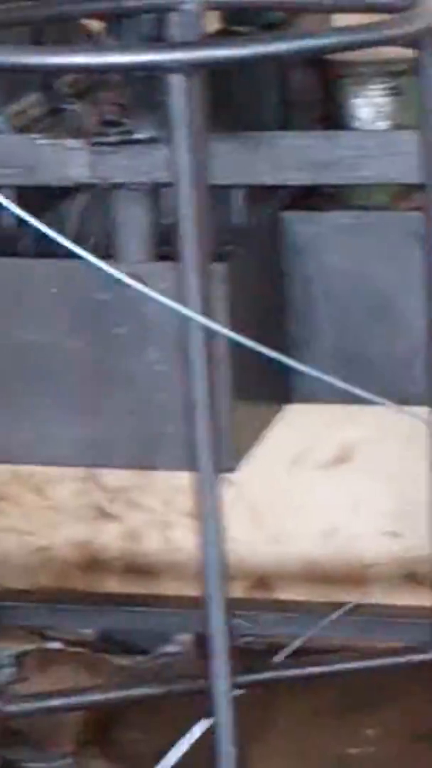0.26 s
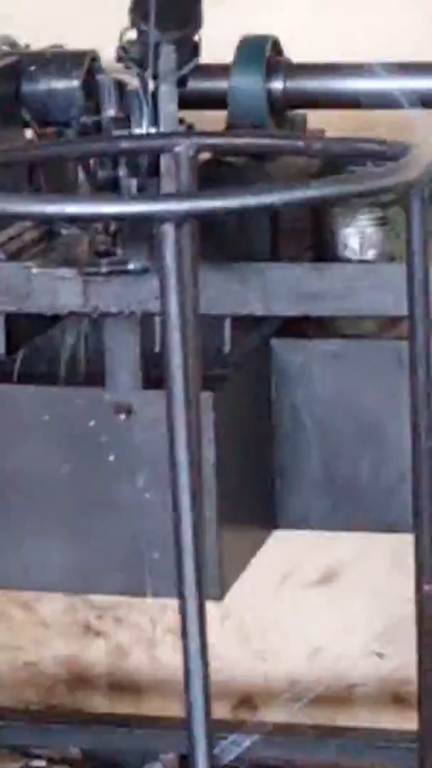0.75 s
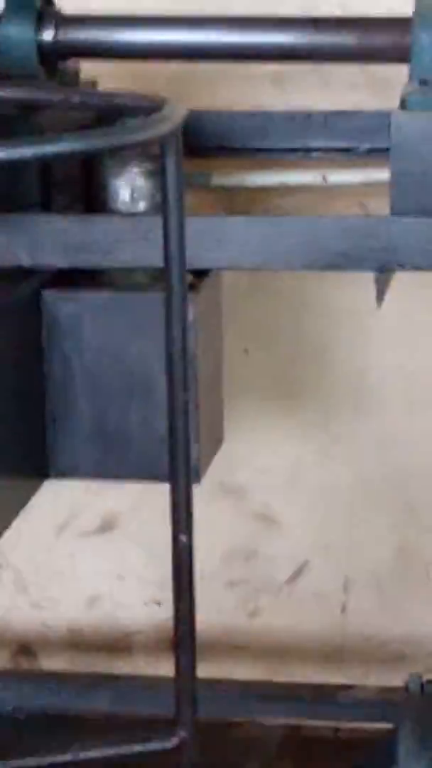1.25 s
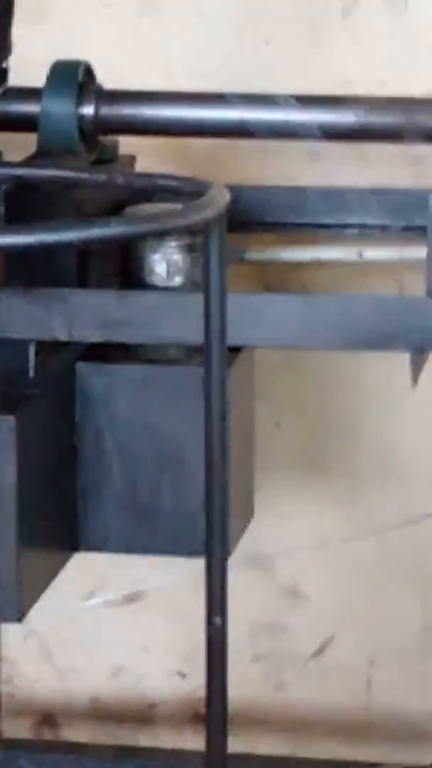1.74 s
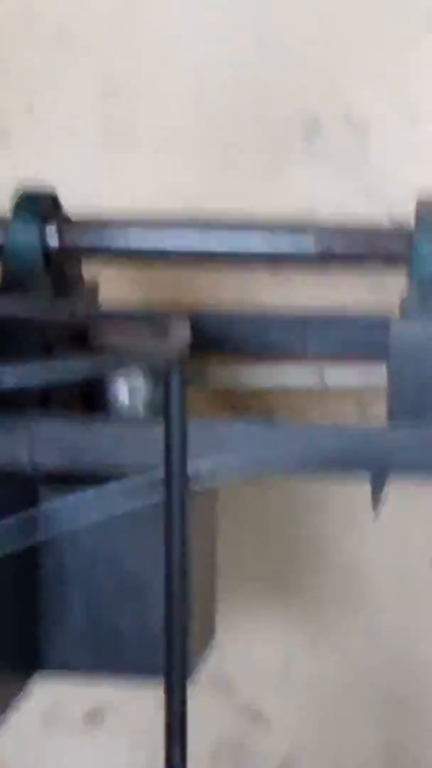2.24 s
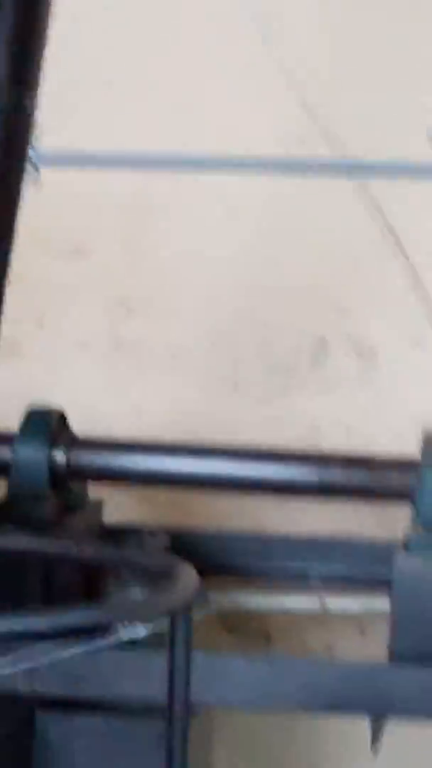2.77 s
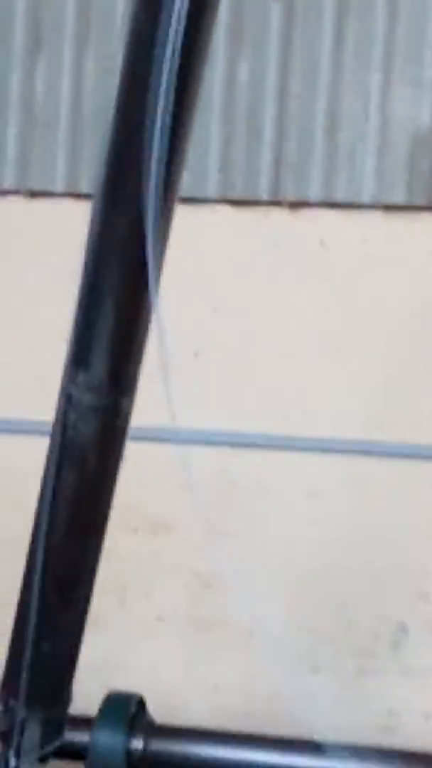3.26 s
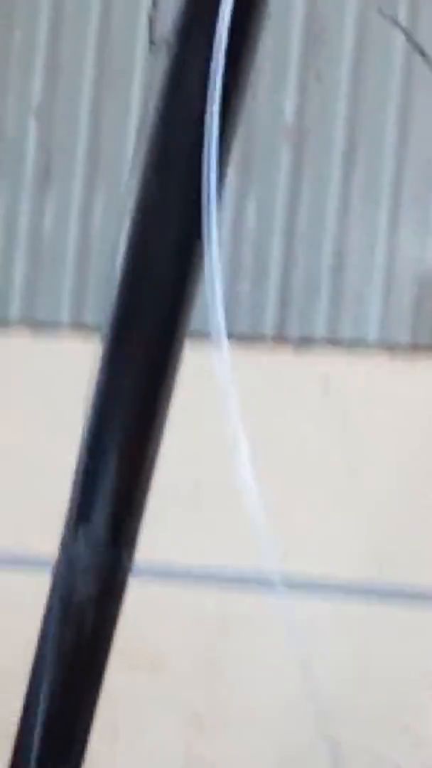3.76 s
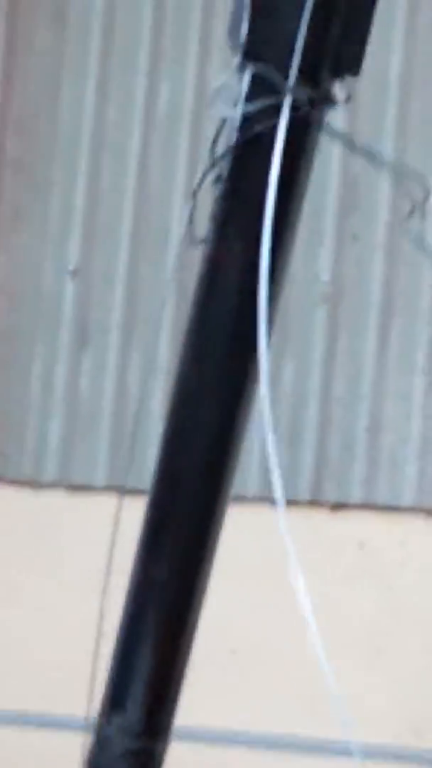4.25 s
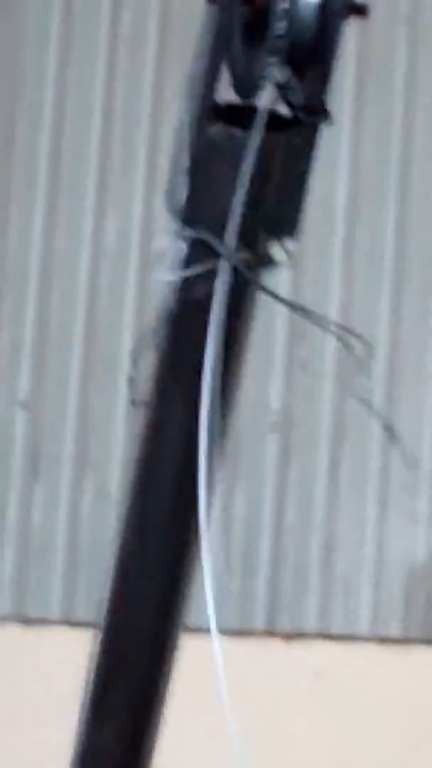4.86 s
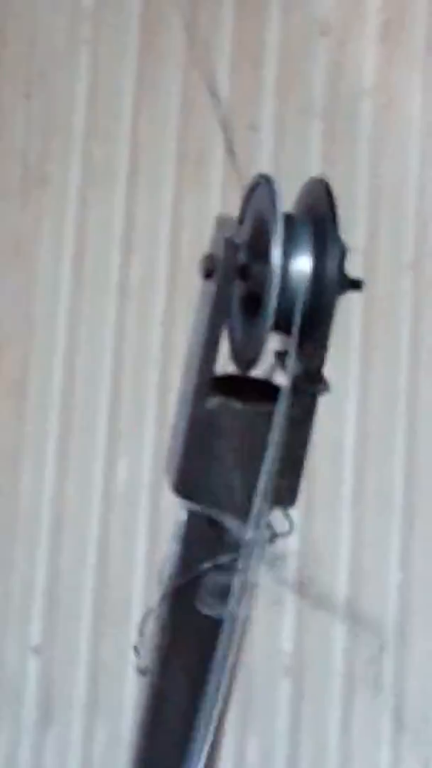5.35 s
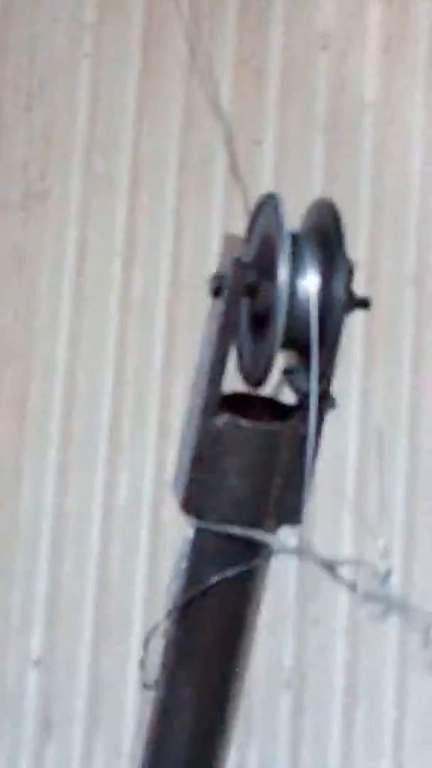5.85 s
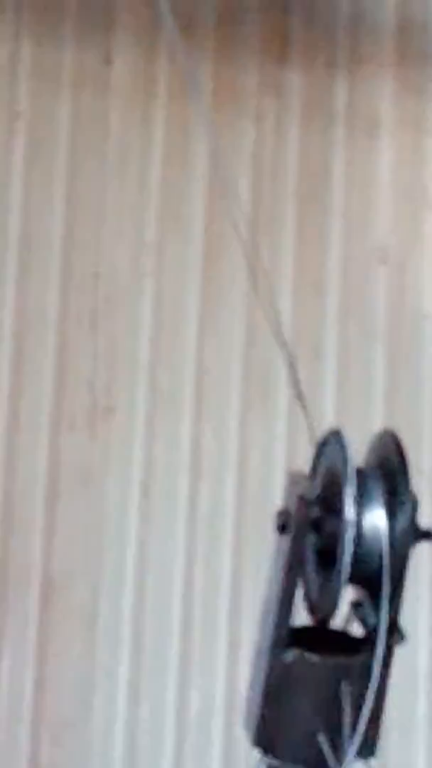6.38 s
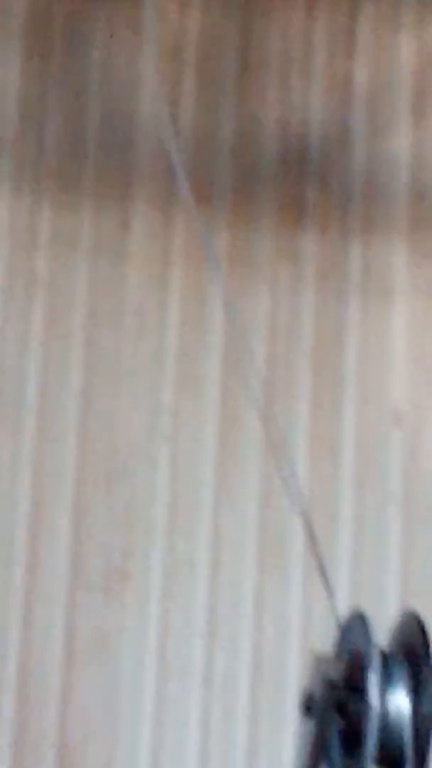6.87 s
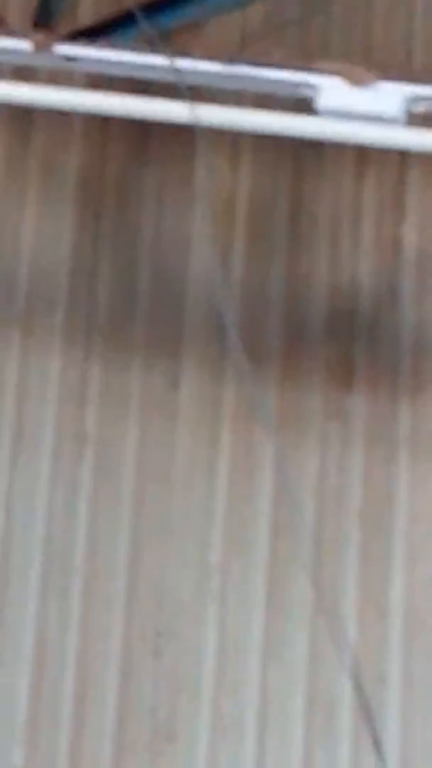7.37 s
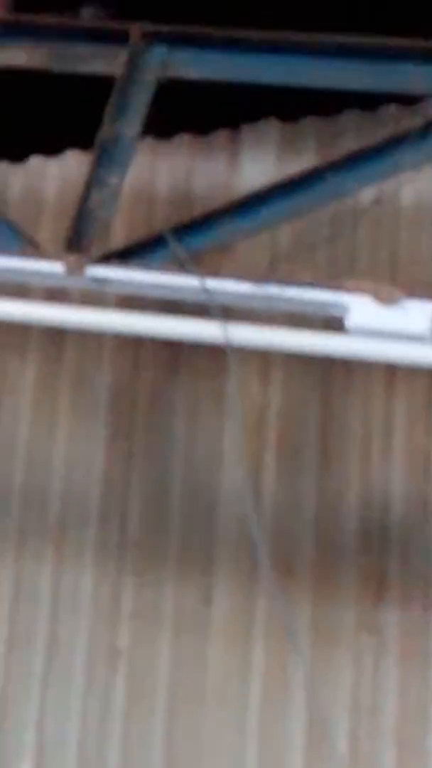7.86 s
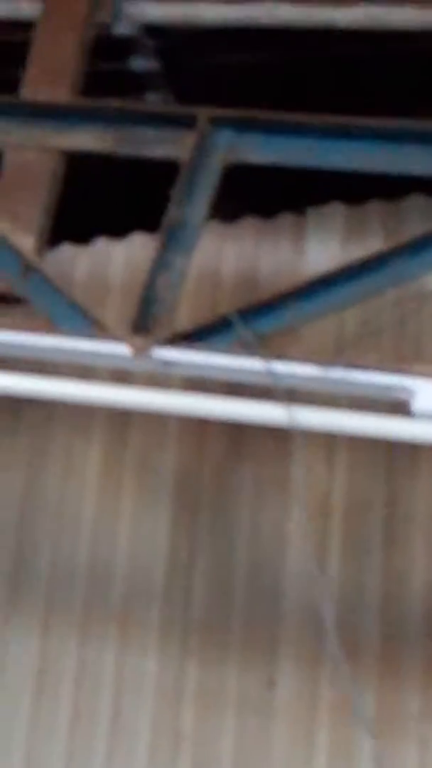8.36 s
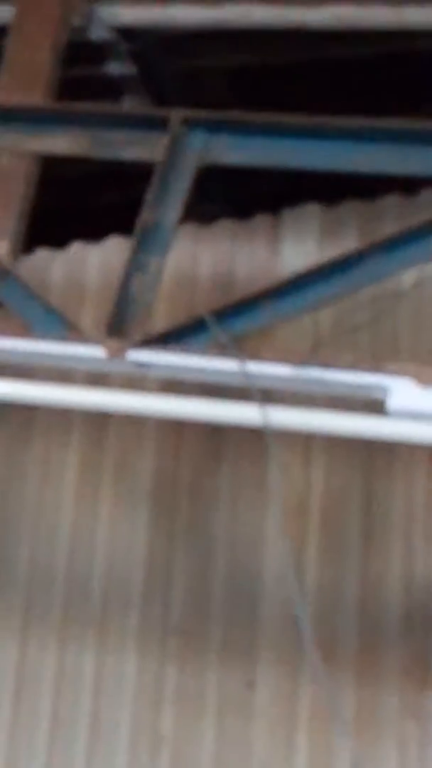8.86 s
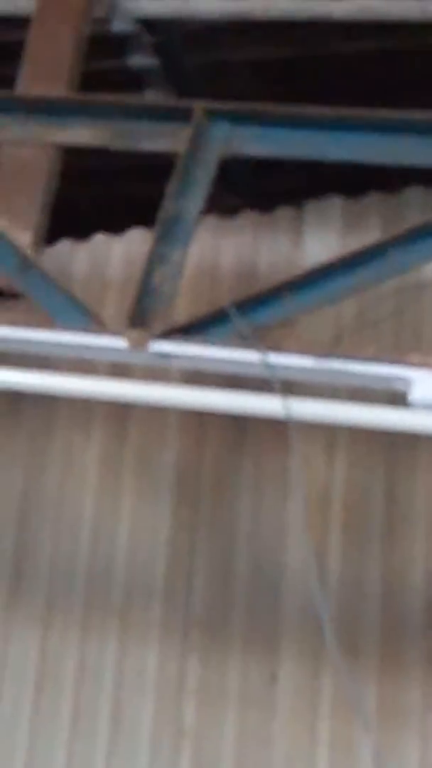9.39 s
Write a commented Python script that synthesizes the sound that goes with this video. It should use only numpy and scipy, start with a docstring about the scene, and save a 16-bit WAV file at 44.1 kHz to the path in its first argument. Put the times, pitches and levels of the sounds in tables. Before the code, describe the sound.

Latch click, hard clank, then a harsh rattle of rollers and wire coasting to rest, repeated four times over faint workshop hiss and hum.

```python
"""Workshop hiss and motor hum come first, then slack wire ticking on its guides in a metal-roofed shed.
A wire weaving machine works in strokes before two small microphones: a latch clicks, the drive clanks in,
feed rollers and wire rattle through the steel frame for a second and coast to rest.
Filtered noise makes the hiss, sines the hum, noise bursts into ringing modes the struck metal,
random contacts through frame resonances the rattle, and feedback delays the shed."""
import sys
import numpy as np
from scipy import signal
from scipy.fft import rfft, irfft, next_fast_len
from scipy.io import wavfile
from scipy.ndimage import map_coordinates

SR = 44100
rng = np.random.default_rng(int(sys.argv[2]) if len(sys.argv) > 2 else 0)


def generate_wav(sig):
    """Save sig (samples, or channels by samples) to the path in sys.argv[1] as 16-bit PCM at SR."""
    pcm = np.round(np.clip(np.atleast_2d(sig).T, -1, 1) * 32767).astype(np.int16)
    wavfile.write(sys.argv[1], SR, pcm)


N = 424241
SLOW = np.arange(0, N + 40, 40) / SR   # time steps of all slow controls, in seconds


def from_db(db):
    """dB to gain."""
    return 10 ** (np.asarray(db) / 20)


def rms_one(x):
    """Scaled to rms 1."""
    return x / np.sqrt(np.mean(x ** 2) + 1e-20)


def in_time(rows):
    """Columns of a curve, read at the slow steps."""
    s, *columns = np.transpose(rows)
    return np.array([np.interp(SLOW, s, column) for column in columns])


def per_sample(slow):
    """A slow control filled in to one value a sample."""
    return np.interp(np.arange(N) / SR, SLOW, slow)


def at_hz(points, hz):
    """A spectrum read on a log-frequency axis."""
    points_hz, values = np.transpose(points)
    return np.interp(np.log(hz), np.log(points_hz), values)


def drift(rate_hz):
    """Slow random wander of rms 1: noise through two equal low-pass poles."""
    r = np.exp(-2 * np.pi * rate_hz * SLOW[1])
    settle = 2000   # steps dropped while the filter settles
    noise = rng.standard_normal(len(SLOW) + settle)
    return rms_one(signal.lfilter([1], [1, -2 * r, r * r], noise)[settle:])


def left_right(tilt_db):
    """Gains of left and right whose levels differ by the tilt."""
    return from_db([[tilt_db / 2], [-tilt_db / 2]])


def ring(x, hz, t60_s):
    """A decaying mode: a unit click sets a sine of height 1 ringing."""
    r = from_db(-60 / (t60_s * SR))
    w = 2 * np.pi * hz / SR
    return signal.lfilter([0, np.sin(w)], [1, -2 * r * np.cos(w), r * r], x + 1e-18)


def resonate(x, hz, width_hz):
    """A resonance of gain 1 at its peak."""
    r = np.exp(-np.pi * width_hz / SR)
    poles = [1, -2 * r * np.cos(2 * np.pi * hz / SR), r * r]
    return signal.lfilter(np.array([1, 0, -1]) * (1 - r * r) / 2, poles, x)


def wandering(x, hz, width_hz):
    """A resonance whose centre wanders: shifted down to 0 Hz, smoothed, shifted back up."""
    r = np.exp(-np.pi * width_hz / SR)
    path_hz = hz * per_sample(1 + .0035 * drift(3.0))
    turn = np.exp(2j * np.pi * np.cumsum(path_hz) / SR)
    return 2 * np.real(turn * signal.lfilter([1 - r], [1, -r], x * turn.conj()))


# How alike the two microphones hear each pitch. Each row: frequency in Hz, left-right likeness from 0 to 1.
LIKENESS = [(60, 1), (290, 0.84), (640, 0.46), (1400, 0.031), (3100, 0.16), (15000, 0.068)]
# How each pitch leans between the microphones. Each row: frequency in Hz, left minus right in dB.
SIDES = [(60, -3), (150, -1), (380, -1.5), (950, 1.5), (2380, -2.5), (5980, -9), (15000, 9)]


def spread(pair, hz):
    """Two unrelated signals mixed into left and right, as alike and as balanced as this pitch is heard."""
    alike = np.clip(at_hz(LIKENESS, hz), 0, 1)
    mid, side = np.sqrt(1 + alike), np.sqrt(1 - alike)
    return (left_right(at_hz(SIDES, hz)) * [[mid, side], [mid, -side]]) @ pair


def bands(source, spectrum, db_at, patchy_db):
    """Half-octave bands, each with its own level and flicker; neighbours get unrelated sources."""
    out = 0
    edges_hz = 22 * 2 ** np.arange(0, 9.6, .5)
    for k, (low_hz, high_hz) in enumerate(zip(edges_hz, edges_hz[1:])):
        hz = np.sqrt(low_hz * high_hz)
        band = signal.butter(2, [low_hz, high_hz], "band", fs=SR, output="sos")
        pair = signal.sosfilt(band, source[k % 2])
        level_db = db_at(hz) + at_hz(spectrum, hz) + patchy_db * drift(20.3)
        out = out + per_sample(from_db(level_db)) * spread(pair, hz)
    return out


def scattered(per_s, modes, db_at):
    """Uneven clicks at random moments, each ringing one mode, leaning at random left or right."""
    out = np.zeros((2, N))
    size_db = 3 * np.minimum(rng.exponential(1, N), 4)
    lean_db = np.outer([1, -1], rng.normal(0, 3, N))
    sizes = rng.choice([-1, 1], N) * from_db(size_db + lean_db)
    clicks = rng.random(N) < per_s * per_sample(from_db(4 * drift(8))) / SR
    dealt = np.where(clicks, rng.integers(0, len(modes), N), -1)
    for k, (hz, t60_s) in enumerate(modes):
        strikes = sizes * (dealt == k) * per_sample(from_db(db_at(hz)))
        out += left_right(at_hz(SIDES, hz)) * ring(strikes, hz, t60_s)
    return out


def blows(events, modes, ring_db, crack_hz, crack_db, rise_s, focus_db, rough):
    """Each blow is a strike and a brief chatter: a crack of noise, and the modes near its two pitches.

    Each event: start in seconds, level in dB, low and high pitch in Hz, chatter in seconds,
    low and high ring in dB, left minus right in dB. The focus is dB lost per octave away from a pitch.
    """
    detune, twin_split, flutter_spread_db = .005, .012, 2.5   # the first two are shares of the pitch
    out, t = np.zeros((2, N + SR)), np.arange(SR // 4) / SR
    wide = signal.butter(2, crack_hz, "band", fs=SR, output="sos")
    push = rms_one(t * np.exp(-t / rise_s)) ** 2 / len(t)   # swells and dies away; peaks at the rise time
    for s, level_db, low_hz, high_hz, chatter_s, low_db, high_db, pan_db in events:
        chatter_s = max(chatter_s, .001)
        # the modes nearest to the two pitches lead
        low_hz, high_hz = (min(modes, key=lambda mode: abs(mode[0] - hz))[0] for hz in (low_hz, high_hz))
        chatter = rng.standard_normal(len(t)) * np.exp(-t / chatter_s) * (1 - np.exp(-t / rise_s))
        tint = resonate(chatter, low_hz, 0.041 * low_hz) + resonate(chatter, high_hz, 0.64 * high_hz)
        blow = from_db(crack_db) * signal.sosfilt(wide, chatter + 0.55 * tint)
        for (hz, t60_s), (turn, off, split) in zip(modes, rng.random((len(modes), 3))):
            from_low_db = low_db - focus_db * abs(np.log2(low_hz / hz))
            from_high_db = high_db - focus_db * abs(np.log2(high_hz / hz))
            db = max(from_low_db, from_high_db)
            if db <= -30:   # far modes stay silent
                continue
            hz = hz * (1 + detune * (2 * off - 1))
            twin_hz = hz * (1 + twin_split * (2 * split - 1))
            strike = push * np.sin(2 * np.pi * (hz * t + turn)) * 2
            strike = strike + rough * chatter / np.sqrt(chatter_s * SR)
            knots = t[::300]
            flutter_db = flutter_spread_db * np.interp(t, knots, rng.standard_normal(len(knots)))
            twins = ring(strike, hz, t60_s) + .5 * ring(strike, twin_hz, t60_s)
            blow += from_db(db + ring_db - 3.5 + flutter_db) * twins
        out[:, round(s * SR):][:, :len(t)] += from_db(level_db) * left_right(pan_db) * blow
    return out[:, :N]


# Air of the workshop above 1500 Hz. Each row: time in seconds, relative level in dB.
HISS = [(0, -32), (.38, -32), (1.9, -33.5), (2.5, -35.5), (4.0, -32.5), (4.7, -36.5), (6.2, -35),
        (6.8, -36), (7.2, -33.5), (8.8, -35), (9.62, -34.5)]
# Colour of the workshop from rumble to hiss. Each row: frequency in Hz, relative level in dB per Hz.
SHOP_COLOUR = [(15, -63), (25, -19), (96, -20), (130, -3), (189, -30), (284, -18), (324, -6.5), (382, -27),
               (473, -19.5), (729, -14.5), (2150, -27), (2460, -25), (2890, -20.5), (4450, -24),
               (15800, -21)]
# Motor hum across the shop. Each row: frequency in Hz, relative level in dB.
HUM = [(100, -74.5), (195, -63), (388, -68.5)]


def workshop():
    """Banded noise for the hiss and rumble of the shed, sines wavering in level and phase for the hum."""
    hiss_db = in_time(HISS)[0]
    db_at = lambda hz: hiss_db if hz > 1500 else -43.0   # the rumble below has no level curve
    out = from_db(8.0) * bands(rng.standard_normal((2, 2, N)), SHOP_COLOUR, db_at, patchy_db=1.8)
    t = np.arange(N) / SR
    for hz, db in HUM:
        level = per_sample(from_db(db - 1.0 + 2.0 * drift(2.7)))
        phase = per_sample(1.83 * drift(4.8))   # radians
        out = out + level * np.sin(2 * np.pi * hz * t + phase)
    return out


def shed(x):
    """Walls and roof answer: six feedback delays a side, duller on every round."""
    t60_s, wall_cut_hz = 0.47, 7400   # decay before the dulling is counted
    size = next_fast_len(N + SR)
    w = 2 * np.pi * np.arange(size // 2 + 1) / size
    dull = np.exp(-2 * np.pi * wall_cut_hz / SR)
    wall = (1 - dull) / (1 - dull * np.exp(-1j * w))
    out = np.zeros((2, len(w)), complex)
    for k, lag in enumerate(rng.integers(300, 1500, 12)):   # lags in samples
        loop = from_db(-60 * lag / SR / t60_s) * wall * np.exp(-1j * w * lag)
        out[k % 2] += loop / (1 - loop) * (-1) ** (k // 2)
    return irfft(out * rfft(x, size), size)[:, :N]


# Rings of the wire and its guides. Each row: nominal frequency in Hz, decay by 60 dB in seconds.
WIRE_MODES = [(2120, .05), (2300, .06), (2700, .1), (3020, .07), (3600, .09), (3970, .08), (4250, .08),
              (4550, .14), (4900, .055), (5700, .08), (5930, .13), (6250, .09), (7090, .025), (11885, .045)]


def stray_ticks():
    """Faint ticks of the wire at any time: random clicks ringing its modes, but for the two highest."""
    return scattered(30, WIRE_MODES[:-2], lambda hz: np.full(len(SLOW), -63.0))


# Slack wire on its guides. Each row: start in seconds, level in dB, pitch in Hz (the nearest mode leads),
# chatter in seconds, ring in dB.
TICKS = [(0.086, -38, 3950, 0.041, -14), (.128, -30, 3950, 0.034, -3), (.15, -39, 2300, .03, 1),
         (2.338, -20, 7340, .005, -23), (2.347, -31.5, 4550, 0.041, -22), (2.427, -28, 2980, 0.012, -17),
         (3.898, -17.5, 2930, 0.011, -19), (4.209, -35, 3950, .012, -9), (4.481, -34, 5700, 0.012, 0),
         (4.485, -25, 2980, 0.02, -10), (4.506, -40, 4900, 0.015, 2), (4.521, -45, 5700, .015, -2),
         (4.538, -46, 4900, .012, 1), (6.39, -48, 7090, .015, 11), (6.642, -18.5, 7090, 0.0062, -6),
         (6.653, -29, 7090, 0.022, 4.5), (6.66, -42, 2980, .012, 1), (6.68, -35.5, 6250, 0.03, 1),
         (6.849, -39, 4250, 0.013, -9), (7, -37.5, 3930, 0.057, -20), (7.026, -27, 5930, 0.022, -12),
         (7.051, -27.5, 4550, 0.042, -19), (7.04, -37, 2700, .03, 0), (7.045, -40, 3600, .03, -5),
         (7.058, -43, 4550, .012, 1), (7.078, -36, 2120, .008, 3), (7.066, -22.5, 12000, 0.0068, 18),
         (7.1, -28.5, 5930, 0.014, -6), (7.119, -38, 11885, 0.0098, 18), (8.671, -33.5, 4500, 0.069, -8),
         (8.87, -31, 2980, 0.073, -8), (8.965, -28, 2980, 0.023, -12), (9.121, -25.5, 5700, 0.017, -18),
         (9.185, -26, 4900, 0.02, -13), (9.2, -31.5, 3950, 0.026, -8), (9.222, -25, 2980, 0.039, -1),
         (9.229, -33, 4900, .02, 1), (9.239, -24, 3950, 0.008, -1), (9.261, -28, 3930, 0.016, -2.5),
         (9.266, -38, 4900, .015, 1), (9.328, -40, 2980, .015, 3), (9.342, -48, 2300, .012, 4.5),
         (9.275, -36, 2300, .02, 0.5), (9.29, -29, 2980, .03, -3), (9.415, -30, 7090, 0.018, -13),
         (9.493, -24.5, 2980, 0.0063, -15)]
# Where a tick sits between the microphones. Each row: pitch in Hz, left minus right in dB.
TICK_SIDES = [(3000, -15.5), (4000, -31), (5500, -10.5), (7090, -26), (11885, 11)]


def wire_ticks():
    """Slack wire touches a guide: a short chatter rings one or two wire modes, a guide mode faintly joining."""
    guide_hz, guide_db = 2980, -28
    taps = [(s, db, guide_hz, hz, chatter_s, guide_db, ring_db, at_hz(TICK_SIDES, hz))
            for s, db, hz, chatter_s, ring_db in TICKS]
    return blows(taps, WIRE_MODES, ring_db=-9.0, crack_hz=[2300, 12500], crack_db=-16,
                 rise_s=0.0025, focus_db=150, rough=0.46)


# The wire snaps taut, dry. Each row: start in seconds, peak level in dB before panning, low cut in Hz.
SNAPS = [(3.887, -26, 9000), (4.484, -23, 1980), (6.642, -28, 2500), (7.026, -19.5, 1990),
         (9.121, -29, 4500), (9.128, -31, 2600), (9.243, -20, 2200)]


def wire_snaps():
    """Wire snapping taut: a dry noise crack dying in a few milliseconds, without its bass."""
    decay_s, pan_db = 0.0018, -7   # left minus right
    out, t = np.zeros((2, N)), np.arange(SR // 100) / SR
    for s, db, low_hz in SNAPS:
        no_bass = signal.butter(2, low_hz, "high", fs=SR, output="sos")
        crack = signal.sosfilt(no_bass, rng.standard_normal(len(t)) * np.exp(-t / decay_s))
        crack = crack / np.abs(crack).max()
        out[:, round(s * SR):][:, :len(t)] += from_db(db) * left_right(pan_db) * crack
    return out


# The frame groans as the load shifts. Each row: start in seconds, level in dB, pitch in Hz.
GROANS = [(0.759, -22.5, 410), (1.519, -31.5, 210), (3.471, -28, 210), (3.65, -32, 210), (3.779, -54, 210),
          (3.83, -47, 700), (3.85, -54, 268), (4.96, -28, 210), (5.071, -24.5, 210), (5.522, -27.5, 210),
          (5.801, -29.5, 210), (6.13, -42.5, 210), (6.2, -45.5, 268), (6.28, -52, 268), (8.19, -27.5, 210),
          (8.321, -36, 210), (8.509, -36.5, 410)]
# Low rings of the frame. Each row: nominal frequency in Hz, decay by 60 dB in seconds.
GROAN_MODES = [(210, .17), (268, .2), (410, .12), (700, .1)]


def frame_groans():
    """The loaded frame groans: slow-rising low blows, each led by one deep mode."""
    heaves = [(s, db, hz, hz, 0.032, 0, 0, -2) for s, db, hz in GROANS]
    return blows(heaves, GROAN_MODES, ring_db=-2.0, crack_hz=[150, 600], crack_db=-13,
                 rise_s=0.0059, focus_db=45, rough=0.63)


# Latch releasing before a stroke. Each row: start in seconds, first, second and third touch in dB,
# tilt in dB (added to the high ring, taken off the low).
LATCH = [(0.290, -35.5, -44, -56, -2.5), (2.479, -33.5, -37, -54, -0.5), (4.63, -33, -39.5, -53.5, 3.5),
         (7.25, -35.5, -39, -49, -3.5)]
# The three touches of a release. Each row: delay in seconds, chatter in seconds, low ring in dB,
# high ring in dB, left minus right in dB.
LATCH_TOUCHES = [(0., 0.018, -12.5, -13, -13), (.022, 0.022, -8, 1.5, -3), (.06, .015, 3, 10, -5)]
# Rings of the latch. Each row: nominal frequency in Hz, decay by 60 dB in seconds.
LATCH_MODES = [(715, .15), (1400, .05), (1650, .06), (1900, .05), (2050, .05), (2500, .04), (3150, .05),
               (3600, .05), (4000, .05)]


def latch_clicks():
    """The latch lets go in three quick touches, each ringing its low and high modes."""
    low_hz, high_hz = 705, 1900
    touches = []
    for s, *touch_dbs, tilt_db in LATCH:
        for db, (after, chatter_s, low_db, high_db, pan_db) in zip(touch_dbs, LATCH_TOUCHES):
            touches.append((s + after, db, low_hz, high_hz, chatter_s, low_db - tilt_db, high_db + tilt_db, pan_db))
    return blows(touches, LATCH_MODES, ring_db=-0.5, crack_hz=[900, 5000], crack_db=-3.0,
                 rise_s=0.0025, focus_db=15, rough=1.0)


# Clanks of the drive. Each row: start in seconds, level in dB, low pitch in Hz, high pitch in Hz,
# high ring over low ring in dB.
CLANKS = [(0.398, -29.5, 720, 1270, 1), (0.408, -29, 820, 2410, 13), (0.417, -20, 1580, 2000, 11),
          (0.439, -27.5, 1240, 3410, 4), (0.545, -30, 980, 1880, -14), (0.594, -28, 1270, 2990, 10),
          (0.633, -24, 1220, 4300, -6), (1.5, -29, 1020, 1270, 8), (2.598, -17, 620, 1790, 3.5),
          (2.633, -20, 2990, 4210, 11), (2.615, -19.5, 700, 1800, 1), (2.655, -23, 2990, 4210, -1),
          (2.678, -22, 1270, 2990, 2.5), (2.755, -26, 2240, 2990, 5), (2.945, -21, 1270, 2990, 5),
          (2.985, -25.5, 4535, 2990, 2), (2.672, -21.5, 720, 2990, -7), (3.085, -24.5, 1270, 2240, -4),
          (3.105, -21, 620, 1270, -6), (3.255, -23, 1020, 1270, 6), (3.5, -25, 1270, 620, 2),
          (3.615, -23.5, 620, 2240, -3), (3.9, -42, 1020, 2240, 6), (4.737, -29.5, 2000, 5900, 4),
          (4.749, -18.5, 620, 2400, 12), (4.757, -23.5, 720, 1800, 15.5), (4.784, -15, 3900, 5900, 2),
          (4.791, -18, 2240, 4535, -1.5), (4.957, -19, 1280, 2880, -11), (5.924, -35, 920, 2190, 14),
          (5.94, -34, 3700, 3220, 13), (5.985, -34.5, 2240, 3220, 8), (6.04, -40, 2990, 3220, 3),
          (6.12, -45, 2990, 4535, 5), (6.17, -48, 3900, 4535, 4), (7.337, -28, 720, 2000, -4),
          (7.342, -27, 1020, 3900, 0), (7.358, -25, 2410, 3450, -1), (7.352, -14, 972, 2030, -7),
          (7.368, -17, 1220, 1770, -5), (7.546, -20, 1340, 2220, 5), (7.825, -38, 1030, 3750, -7)]
# Rings of the drive. Each row: nominal frequency in Hz, decay by 60 dB in seconds.
CLANK_MODES = [(620, .07), (720, .06), (1020, .04), (1270, .08), (1800, .06), (2000, .06), (2240, .06),
               (2410, .07), (2990, .17), (3220, .1), (3450, .08), (3900, .06), (4210, .14), (4535, .15),
               (5900, .04), (7150, .06)]


def drive_clanks():
    """Drive parts strike: a fast hard blow rings the metal modes close to its two pitches."""
    hits = [(*row, 0.012, -tilt_db / 2, tilt_db / 2, -12) for *row, tilt_db in CLANKS]
    return blows(hits, CLANK_MODES, ring_db=-7.5, crack_hz=[800, 6000], crack_db=-4.5,
                 rise_s=0.00092, focus_db=74, rough=0.21)


# Strokes of the machine. Each row: engaging time in seconds, full drive of rattle, frame rumble, wire zing
# and sizzle in dB, rumble growth in dB per second, brightness of the start in dB, rumble while coasting in dB.
STROKES = [(0.403, -24.5, -28.5, -30, -21, 4, 2, -3), (2.606, -23.5, -28.5, -27, -24, -2, 11.5, -1),
           (4.75, -23.5, -29, -25.5, -21, -25.5, 11, 6), (7.348, -24.5, -25.5, -24, -22.5, 24, 6.5, -4.5)]
# Course of every stroke. Each row: seconds after engaging, then rattle, frame rumble, wire zing and sizzle
# in dB relative to full drive.
STROKE_SHAPE = [(0, -7, -20.5, -16.5, 0), (.14, -7.5, -10.5, -16.5, -26), (.21, -5.5, -2, -6.5, -1),
                (.4, -4, 2.7, -4.5, 1), (.86, -3.43, 2, -1.65, 3.5), (1.01, -6.5, 1.5, -4.5, 4),
                (1.09, -11.5, -4.5, -10.5, 3.5), (1.18, -19, -6.5, -12.5, 3.5),
                (1.32, -31.5, -19, -26, 1.5), (1.55, -39.5, -25, -36, -19.5), (1.9, -43.5, -41, -51, -42)]
# Uneven running of rattle, frame rumble, wire zing and sizzle: one column, relative depth in dB.
THROB_DB = [.9, 2.2, .9, 1.8]
START_S, COAST_S = 0.174, 1.05   # after engaging: the feed takes up, coasting begins


def stroke_gains():
    """Level in time for any pitch: one stroke shape replayed, its four parts blended over the spectrum."""
    throb_hz, rumble_full_s = 11, 0.62   # the rumble's growth is counted up to here
    silent = [-95] * 4
    rows = []
    for start, *full_db, growth, bright_db, coast_db in STROKES:
        rows.append((start - .006, *silent))
        for s, *db in STROKE_SHAPE:
            rumble_db = growth * min(s - rumble_full_s, 0) + coast_db * (s > COAST_S)
            early_db = bright_db * (s < START_S)
            rows.append((start + s, *(np.add(db, full_db) + [0, rumble_db, early_db, early_db])))
        rows.append((rows[-1][0] + .05, *silent))
    shared = drift(throb_hz)
    parts_db = in_time(rows) + [db * (0.86 * shared + 0.33 * drift(throb_hz)) for db in THROB_DB]
    parts_log_hz = np.log([70, 150, 300, 450, 2300, 2900, 7200, 8500])
    part_there = np.eye(4)[[0, 1, 1, 0, 0, 2, 2, 3]].T   # which part leads at each of these pitches
    share = lambda hz: [np.interp(np.log(hz), parts_log_hz, row) for row in part_there]
    return lambda hz: share(hz) @ parts_db


# Broad colour of the rattle. Each row: frequency in Hz, relative level in dB per Hz.
RATTLE_COLOUR = [(15, -57), (25, -27), (60, -14), (100, -8), (150, -4), (205, -4), (333, -2.5), (587, 6),
                 (834, 3), (1280, 10.5), (2660, 0.5), (2970, 0), (4570, 4), (6490, -78), (7830, -45),
                 (12400, -24), (15800, -16)]
# Resonances of the steel frame: one column, centre frequency in Hz.
FRAME_HZ = [210, 268, 380, 434, 520, 606, 790, 1033, 1170, 1275, 1520, 2240, 2990, 3700, 4330, 4535, 4840,
            5330, 5690, 5920, 6485]
# The same resonances in the same order. Each row: width in Hz, relative level in dB.
FRAME = [(8.7, -2), (6.86, -2), (21.6, -18), (11.6, -2.5), (27, -8.5), (19, -3), (47, -9.5), (43.6, -5),
         (44.3, -13.5), (43, -12), (57, -9), (46, 0.5), (60, 2), (423, -4), (178, -5.5), (50, -0.5),
         (118, -23), (83, -11.5), (107, -10), (87, -8.5), (70, -9)]
# How strongly the frame rings in each stroke: one column, relative level in dB.
FRAME_RING_DB = [1, 0.15, -0.79, -2.05]


def metal_contacts():
    """Thousands of uneven metal contacts a second, with heavier knocks in clusters among them."""
    shape = (2, 2, N)
    touch = rng.random(shape) < 6000 * per_sample(from_db(1.5 * drift(14))) / SR
    size = from_db(1.68 * np.minimum(rng.exponential(1, shape), 5))
    contacts = rms_one(touch * size * rng.choice([-1, 1], shape))
    knock = rng.random(N) < 150 * per_sample(from_db(4 * drift(15))) / SR
    return rms_one(contacts + from_db(14) * knock * rng.standard_normal(shape))


def frame_ring(contacts, db_at):
    """The contacts set the steel frame ringing; each resonance swells, fades and wanders in pitch."""
    out = np.zeros((2, N))
    starts = np.transpose(STROKES)[0]
    stroke = np.maximum(np.searchsorted(starts, SLOW) - 1, 0)
    since_s = SLOW - starts[stroke]
    # weaker until the feed takes up, standing out more as the drive coasts
    ring_db = np.array(FRAME_RING_DB)[stroke] - 3 * (since_s < START_S) + 1 * (since_s > COAST_S)
    for k, (hz, (width_hz, db)) in enumerate(zip(FRAME_HZ, FRAME)):
        waver_db = 1.6 * drift(12) + drift(1)
        gain = per_sample(from_db(db_at(hz) + db + 14 + ring_db + waver_db))
        # gain ahead of the resonance, so it rings on as the drive slows
        out += spread(wandering(gain * contacts[k % 2], hz, width_hz), hz)
    return out


def loose_clinks(db_at):
    """Loose parts, each with one ring, clink at random and follow the level of the drive."""
    count, low_hz, high_hz, t60_s = 36, 330, 6300, .07
    pitches_hz = np.geomspace(low_hz, high_hz, count) * rng.uniform(.97, 1.03, count)
    loose = [(hz, t60_s) for hz in pitches_hz]
    return scattered(1100, loose, lambda hz: db_at(hz) + at_hz(RATTLE_COLOUR, hz) - 16)


def rattle():
    """Feed rollers and wire: metal contacts heard broadly, through the frame, and in loose parts."""
    contacts = metal_contacts()
    db_at = stroke_gains()
    broad = from_db(-0.5) * bands(contacts, RATTLE_COLOUR, db_at, patchy_db=1.5)
    rings = frame_ring(contacts, db_at) + loose_clinks(db_at)
    low_cut = signal.butter(4, 170, "high", fs=SR, output="sos")   # keeps the skirts of the rings out of the bass
    return broad + signal.sosfilt(low_cut, rings)


def scene():
    """The workshop behind, the shed answering the struck parts, the machine's rattle in front."""
    wire = stray_ticks() + wire_ticks() + wire_snaps()
    struck = wire + frame_groans() + latch_clicks() + drive_clanks()
    return workshop() + from_db(-7.0) * shed(struck.mean(axis=0)) + struck + rattle()


# The microphone pair turns. Each row: time in seconds, lag of the left microphone in milliseconds.
LEFT_LAG = [(0, 0.071), (2.5, 0.0056), (5, -0.15), (7, -0.23), (9.6, -0.27)]


def record(dry):
    """Two small microphones with a dip in the treble; the left hears earlier or later; the top is cut."""
    late = per_sample(in_time(LEFT_LAG)[0]) * SR / 1000   # in samples
    left = map_coordinates(dry[0], [np.arange(N) - late], order=2, mode="nearest")
    pair = np.array([left, dry[1]])
    pair = pair - 0.58 * resonate(pair, hz=7940, width_hz=1400)
    top_cut = signal.ellip(10, .5, 80, 15400, fs=SR, output="sos")
    return signal.sosfilt(top_cut, pair)


dry = scene()
out = record(dry)
generate_wav(out)
```